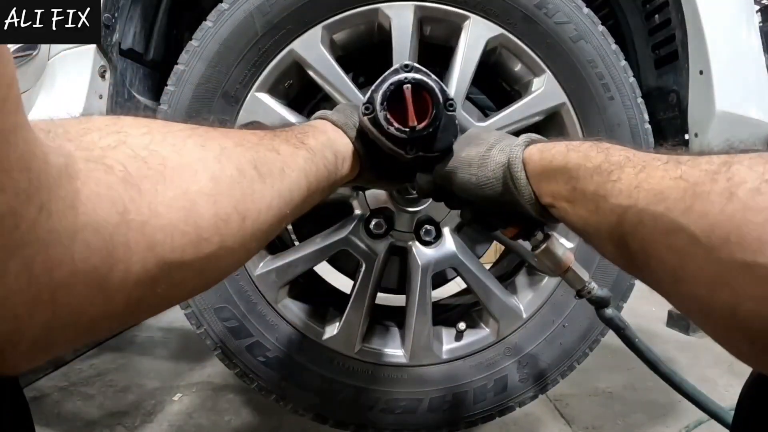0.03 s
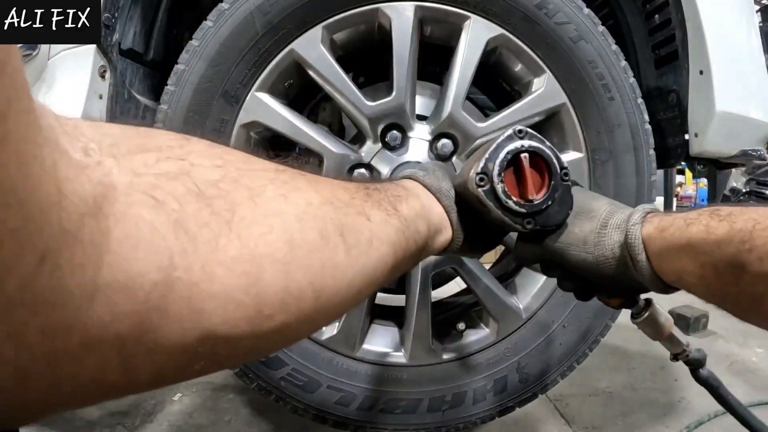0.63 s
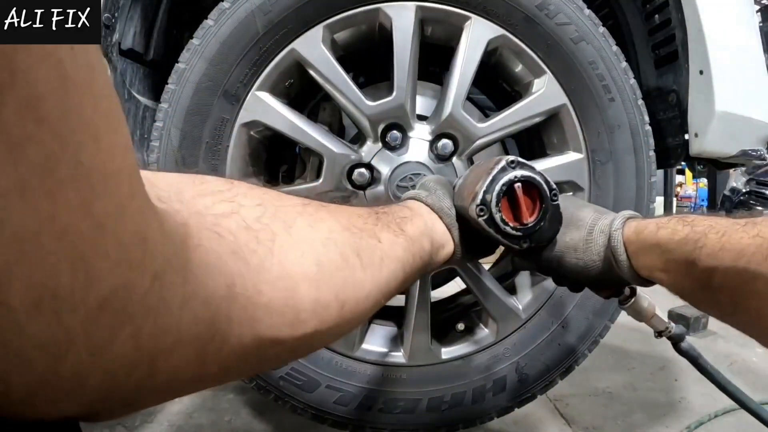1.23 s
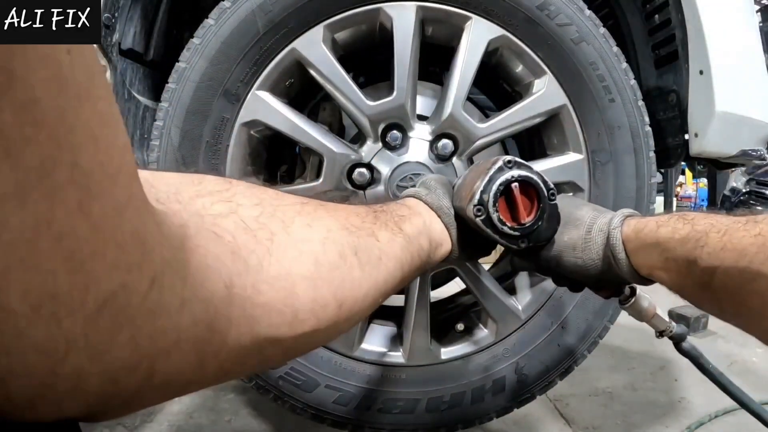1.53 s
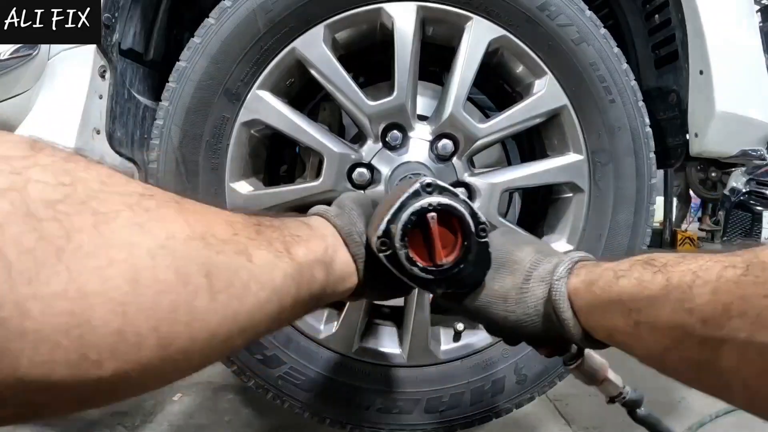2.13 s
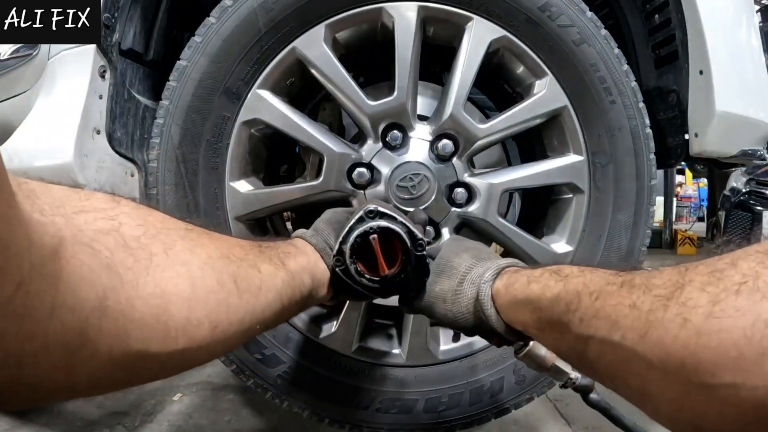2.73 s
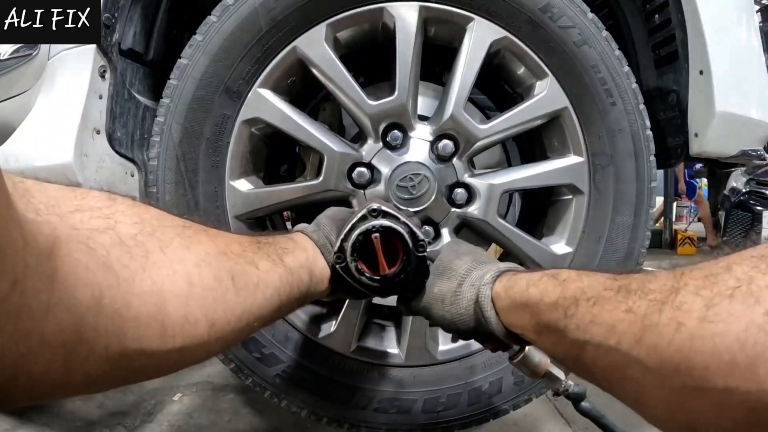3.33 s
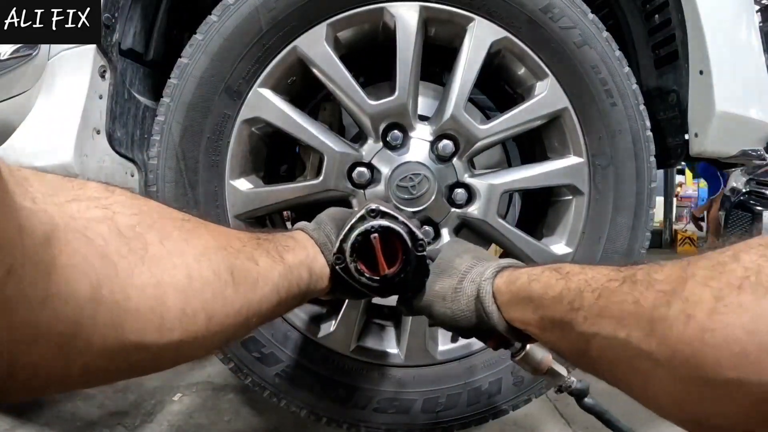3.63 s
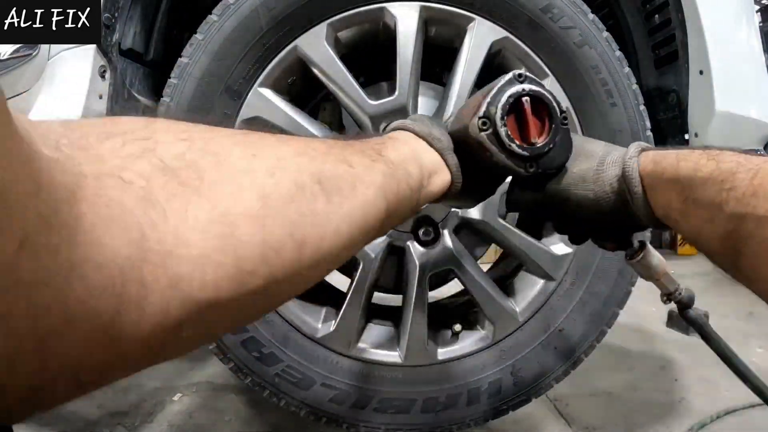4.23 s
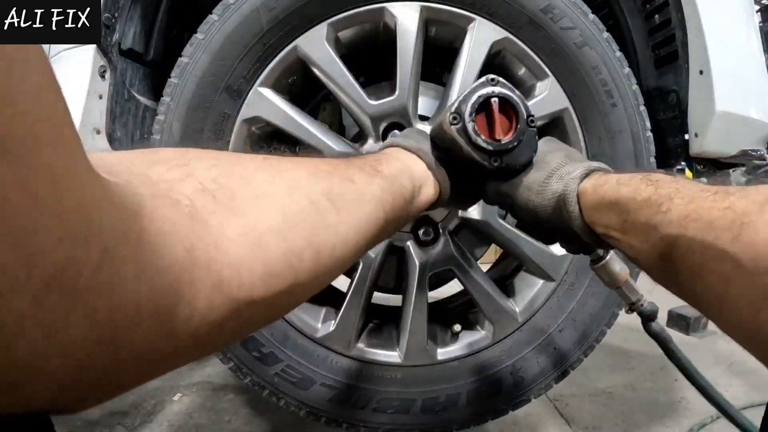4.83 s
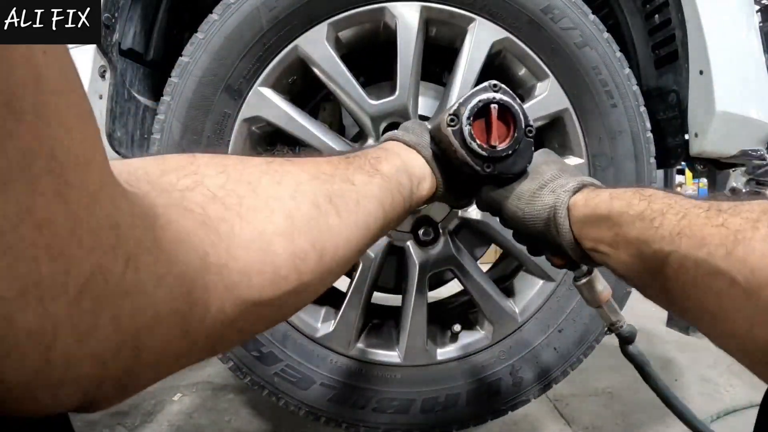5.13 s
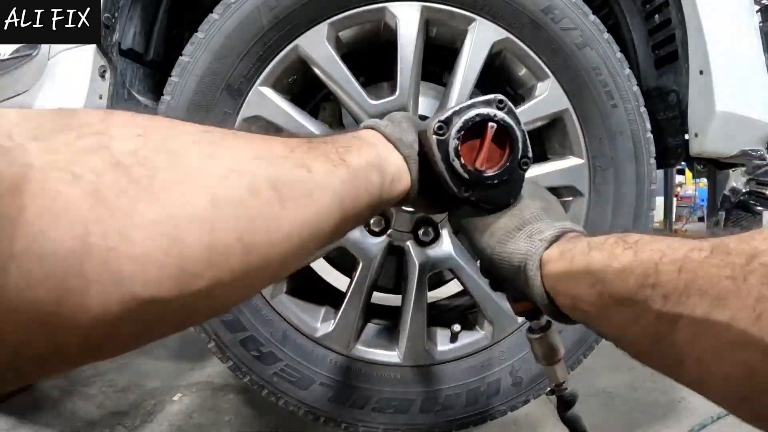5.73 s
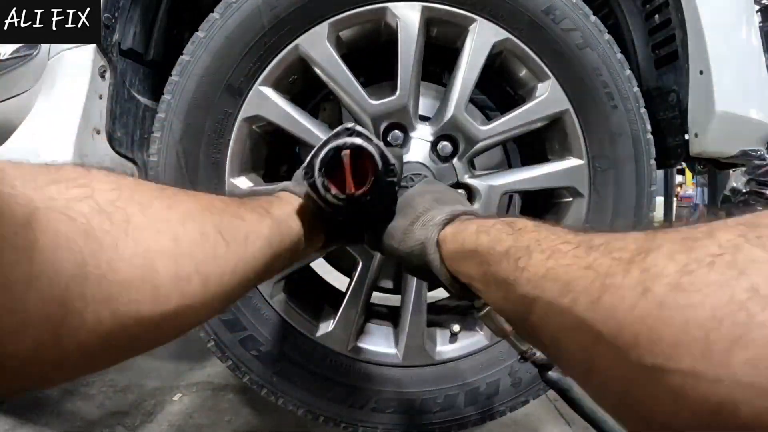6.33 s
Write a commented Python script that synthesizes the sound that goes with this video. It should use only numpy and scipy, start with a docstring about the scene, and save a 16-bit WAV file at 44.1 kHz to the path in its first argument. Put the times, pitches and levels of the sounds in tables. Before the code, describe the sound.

Close, rapid hammering from an air wrench tightens wheel nuts in bursts, its motor whooping up between light metal clinks and scrapes.

```python
"""A garage, with an air impact wrench close to a stereo microphone; workshop machinery hums.
We come in on a wheel nut being tightened: air rushes from the handle, the hammer strikes the anvil
about 29 times a second, steel rings and the wheel booms. The trigger is let go, leaving the hum and a
hiss at the hose. The socket clinks and scrapes onto the next nut, and gloves shuffle. Four more nuts
follow: each time the vane motor whoops up to speed, then the hammering sets in."""
import sys
import numpy as np
from scipy import signal
from scipy.fft import rfft, irfft
from scipy.io import wavfile
from scipy.ndimage import uniform_filter1d

SR = 44100
rng = np.random.default_rng(int(sys.argv[2]) if len(sys.argv) > 2 else 0)


def log_audio(samples):
    """Write samples as a 16-bit WAV file to the path given in sys.argv[1]."""
    # one column per channel
    frames = np.atleast_2d(samples).T
    # limit to full scale, then quantise
    limited = np.clip(frames, -1, 1)
    pcm = np.round(limited * 32767).astype(np.int16)
    wavfile.write(sys.argv[1], SR, pcm)


N = 290619
TIME = np.arange(N) / SR


def from_db(db):
    return 10 ** (np.asarray(db) / 20)


def rms_one(x):
    return x / np.sqrt(np.mean(x ** 2) + 1e-20)


def noise():
    return rng.standard_normal(N)


def drift(samples):
    """Random wander: noise averaged over so many samples."""
    return rms_one(uniform_filter1d(noise(), size=samples))


def gritty(grain_db, grain_s):
    """Noise whose level jumps from one tiny contact to the next."""
    knots = np.arange(0, TIME[-1], grain_s)
    contacts = np.clip(noise()[:len(knots)], -2, 2)
    return rms_one(noise() * from_db(grain_db * np.interp(TIME, knots, contacts)))


def gain_at(spectrum, hz):
    """Gain of a spectrum at given frequencies."""
    points_hz, db = np.transpose(spectrum)
    return from_db(np.interp(np.log(hz + 1e-9), np.log(points_hz), db))


def colour(x, spectrum, size=16384):
    """Minimum-phase filter with the given spectrum; white noise keeps its level."""
    gain = rms_one(gain_at(spectrum, np.fft.rfftfreq(size, 1 / SR)))
    cepstrum = irfft(np.log(gain))
    cepstrum[1:size // 2] *= 2
    cepstrum[size // 2 + 1:] = 0
    return signal.fftconvolve(x, irfft(np.exp(rfft(cepstrum))))[:N]


def lowpass(x, hz, order=2):
    return signal.sosfilt(signal.butter(order, hz, fs=SR, output="sos"), x)


def resonance(x, hz, width_hz):
    return signal.lfilter(*signal.iirpeak(hz, hz / width_hz, fs=SR), x)


def gate(start, stop, edge_s):
    """1 between two times, with sloping edges."""
    return np.clip(np.minimum(TIME - start, stop - TIME) / edge_s + .5, 0, 1)


def spans(rows, edge_s):
    """One gate per row, each at its own level."""
    return sum(from_db(db) * gate(start, stop, edge_s) for start, stop, db in rows)


def fall(t, t60):
    """Sudden start, exponential decay."""
    return (t >= 0) * from_db(-60 * np.maximum(t, 0) / t60)


def strike(t, rise_s, t60):
    """A contact builds over a moment, then dies away."""
    return np.clip(t / rise_s + 1, 0, 1) ** 2 * from_db(-60 * np.maximum(t, 0) / t60)


def swell(t, centre_s, half_s):
    """Flat-topped bump."""
    return np.exp(-((t - centre_s) / half_s) ** 4)


# The trigger held down. Each row: start and stop in seconds, exhaust level in dB.
TRIGGER_PULLS = [(-.6, 0.483, -26.5), (1.102, 2.037, -32), (2.67, 3.945, -27.5), (4.891, 5.817, -26.5),
                 (6.372, 6.7, -22.5)]
# The exhaust from close by. Each row: frequency in Hz, relative level in dB.
EXHAUST_SPECTRUM = [(40, 1.5), (120, 15.5), (400, 15), (600, -17.5), (1500, -2.5), (3000, -3.5),
                    (4500, -9.5), (6500, -14.5), (8300, -26), (10300, -45), (15000, -62)]

def exhaust():
    """Air rushes out of the handle, near the microphone, while the trigger is held."""
    return colour(noise() * spans(TRIGGER_PULLS, edge_s=0.0036), EXHAUST_SPECTRUM)


def sunk(delay_s=0, sink_s=1, stay_s=0.14, recover_s=0.41):
    """How far the background has sunk, 0 to 1: down as the wrench runs, creeping back afterwards."""
    dips = []
    for start, stop, _ in TRIGGER_PULLS:
        sinking = (TIME - start - delay_s) / sink_s
        recovering = 1 - (TIME - stop - stay_s) / recover_s
        dips.append(np.clip(np.minimum(sinking, recovering), 0, 1))
    return np.max(dips, axis=0)


# The workshop's hum, and handling noise. Each row: time in seconds, level in dB.
HUM_LEVELS = [(0.0, -34), (0.4, -46), (1.04, -26.5), (1.08, -29.5), (2.64, -30.5), (3.21, -48), (4.0, -34),
              (4.07, -55), (4.28, -27), (4.37, -35), (4.59, -23.5), (4.68, -38), (4.84, -22), (4.97, -32),
              (5.89, -35.5), (6.35, -25), (6.42, -35), (6.59, -30)]
HANDLING_LEVELS = [(0, -36), (.75, -43), (1.9, -43.5), (2.55, -37), (4.1, -41.5), (4.7, -44), (5.7, -44),
                   (6.2, -29.5), (6.59, -33.5)]
# Low rumble and midrange handling noise. Each row: frequency in Hz, relative level in dB.
RUMBLE_SPECTRUM = [(30, -3.5), (70, -0.5), (105, 3), (150, -3.5), (200, -2), (280, -9), (400, -8.5),
                   (600, -17.5), (1000, -28), (2000, -88)]
HANDLING_SPECTRUM = [(300, -0.5), (700, 3.5), (1000, 1.5), (1500, -1.5), (2200, -4), (3500, -8),
                     (5500, -9.5), (8000, -38), (12000, -72)]

def workshop(hum_hz=52.15, waver_hz=2.58, throb_db=2.5, rumble_db=-29.5, sink_db=5.5):
    """A wavering hum, a low rumble, and midrange handling noise that swells between nuts."""
    pitch = hum_hz + waver_hz * drift(SR // 10)
    throb = from_db(-0.5 + throb_db * drift(SR // 20))
    drone = np.sqrt(2) * throb * np.sin(2 * np.pi * np.cumsum(pitch) / SR)
    hum = from_db(np.interp(TIME, *np.transpose(HUM_LEVELS))) * drone
    rumble = from_db(rumble_db - sink_db * sunk()) * colour(noise(), RUMBLE_SPECTRUM)
    handling_gain = from_db(np.interp(TIME, *np.transpose(HANDLING_LEVELS)))
    return hum + rumble + handling_gain * colour(noise(), HANDLING_SPECTRUM)


def whistle(hz=5200, wander_hz=110, width_hz=300):
    """The hose leak sings: a narrow band of hiss whose pitch wanders."""
    wander = rms_one(uniform_filter1d(drift(SR // 6), size=SR // 6))
    band = rms_one(lowpass(noise(), width_hz / 2))
    return np.sqrt(2) * band * np.sin(2 * np.pi * np.cumsum(hz + wander_hz * wander) / SR)


# The hose leak and a thin hiss above it. Each row: frequency in Hz, relative level in dB.
LEAK_SPECTRUM = [(1000, -16), (3300, -3.5), (4300, 2.5), (4750, 3), (5250, 1.5), (5900, -4), (7500, -10.5),
                 (8500, -22.5), (10000, -14.5), (11500, -28), (15000, -56)]
THIN_SPECTRUM = [(10500, -29), (11400, -1), (12300, 12.5), (13500, 3), (14700, 10), (16000, -16.5)]

def hisses(leak_db=-45.5, thin_db=-57, flutter_db=-2.4, side_db=2, whistle_db=-10):
    """Air flutters out of the hose coupling; a thin hiss lies wide across both channels."""
    down = sunk()
    shut = sunk(delay_s=0.25, sink_s=0.22, stay_s=0.19, recover_s=0.22)   # a later, quicker dip
    flutter = flutter_db * drift(SR // 25)
    leak_gain = from_db(leak_db - 7 * down + flutter)
    thin_gain = from_db(thin_db - 6 * down - 15 * shut + flutter)
    mid = colour(noise(), THIN_SPECTRUM)
    side = from_db(side_db) * colour(noise(), THIN_SPECTRUM)
    leak = colour(noise(), LEAK_SPECTRUM) + from_db(whistle_db) * whistle()
    return leak_gain * leak + thin_gain * np.array([mid + side, mid - side])


# Hammering, nut by nut. Each row: first blow, end, first period and period growth per blow,
# all in seconds, then strength in dB.
HAMMER_BURSTS = [(0.0202, 0.525, .0341, .000102, -16.5), (1.2089, 2.035, .03179, .000166, -15.5),
                 (2.8102, 3.93, .03423, .0000916, -14), (5.0132, 5.81, .0317, .000204, -15),
                 (6.4847, 6.6, .0327, .0001, -14)]

def blow_train(scatter_db=1.1, jitter_s=.0007):
    """Time and strength in dB of each blow: uneven, and slowing as the nut tightens."""
    trains = []
    for first, until, period, growth, level_db in HAMMER_BURSTS:
        late, strong = rng.standard_normal((2, 64))
        k = np.arange(len(late))
        due = first + period * k + growth * k ** 2 / 2
        blows = np.column_stack([due + jitter_s * late, level_db + scatter_db * strong])
        trains.append(blows[due < until])
    return np.vstack(trains)


def per_blow(blows, shape, follow, scatter_db, jitter_s=0, **shape_settings):
    """Lays an envelope at every blow; follow is how much it tracks the blow's strength."""
    times, db = blows.T
    strong, late = rng.standard_normal((len(times), 2)).T
    levels = from_db(db.mean() + follow * (db - db.mean()) + scatter_db * strong)
    out, reach = np.zeros(N), SR // 20
    for at, level in zip(times + jitter_s * late, levels):
        near = slice(max(int(at * SR) - reach, 0), int(at * SR) + reach)
        out[near] += level * shape(TIME[near] - at, **shape_settings)
    return out


# The boom of the wheel from close by. Each row: frequency in Hz, relative level in dB.
WHEEL_SPECTRUM = [(25, -7), (60, -5.5), (120, -0.5), (200, -2.5), (280, 0.5), (370, 3.5), (430, -2.5),
                  (500, -18.5), (600, -52.5), (1200, -38)]

def wheel(blows, shove_db=-20, kick_db=-22):
    """Each blow shoves the tool and the wheel, which boom dully; the rebound adds a kick."""
    shove = per_blow(blows, swell, follow=0.55, scatter_db=1, jitter_s=0.00015,
                     centre_s=-0.011, half_s=0.0093)
    kick = per_blow(blows, swell, follow=0.32, scatter_db=4, jitter_s=0.00017,
                    centre_s=0.0022, half_s=0.0038)
    shaking = rms_one(lowpass(noise(), 600))
    judder = rms_one(np.tanh(2 * shaking))   # play in the socket limits the force
    return colour(judder * (from_db(shove_db) * shove + from_db(kick_db) * kick), WHEEL_SPECTRUM)


def cam_rub(t, lead_s=.0115):
    """The hammer drops onto its cam and rubs along it until the strike."""
    return fall(t + lead_s, t60=1.0) * (t < 0)


# Struck steel at the microphone. Each row: frequency in Hz, relative level in dB.
STEEL_SPECTRUM = [(200, -17), (600, -5), (900, -10), (1430, -1.5), (1800, -5), (2300, 1.5), (3000, 1.5),
                  (3900, 0.5), (4800, -6), (6300, -8), (7100, -14), (8400, -30.5), (9400, -30),
                  (10300, -26.5), (11500, -37.5), (15000, -51)]
# Each nut rings in its own way. Each row: start in seconds, then pitch in Hz and gain in dB
# for its low, main and high ring.
NUT_RINGS = [(0, 2230, -28, 3330, 4.5, 5800, 6), (1.1, 2275, 1.5, 3150, -1, 5600, -5),
             (2.68, 2480, 1, 3300, -15, 5530, -23), (4.9, 2210, -18, 3240, 1.5, 5900, -3),
             (6.37, 2260, -10, 3280, -13, 5760, -4)]

def hammer(blows, crack_db=-3, ring_db=-6, cam_db=-8, seating_db=3, level_db=-3.5):
    """The hammer grinds up its cam, cracks onto the anvil, and socket and nut ring briefly."""
    cam = per_blow(blows, cam_rub, follow=0.98, scatter_db=3, jitter_s=.0008)
    crack = per_blow(blows, strike, follow=0.62, scatter_db=1.6, rise_s=0.0022, t60=0.02)
    ring = per_blow(blows, strike, follow=0.92, scatter_db=1.7, rise_s=0.0019, t60=0.059)
    grind = from_db(cam_db) * cam * gritty(grain_db=1.5, grain_s=0.001)
    impact = (from_db(crack_db) * crack + from_db(ring_db) * ring) * noise()
    steel = colour(grind + impact, STEEL_SPECTRUM)
    out = steel.copy()
    ends = [row[0] for row in NUT_RINGS[1:]] + [np.inf]
    for (start, *rings), end in zip(NUT_RINGS, ends):
        struck = steel * (TIME >= start) * (TIME < end)
        for hz, db in zip(rings[::2], rings[1::2]):
            # each blow lands a little differently
            seating = np.interp(TIME, blows[:, 0], rng.uniform(-1.1, 1, len(blows)))
            out += resonance(struck * from_db(db + seating_db * seating), hz, width_hz=170)
    return from_db(level_db) * out


# Width of the blows at the microphone. Each row: frequency in Hz, side against mid in dB.
BLOW_WIDTH = [(400, -39), (1200, -37), (3200, -50), (5500, -19), (10000, -20.5)]

def stereo(mid, size=512):
    """Nearly mono; the treble reaches the two channels with scattered phase."""
    hz = np.fft.rfftfreq(size, 1 / SR)
    scatter = 1j * rng.choice([-1, 1], len(hz)) * gain_at(BLOW_WIDTH, hz)
    response = np.roll(irfft(scatter), size // 2)
    side = signal.fftconvolve(mid, response)[size // 2:][:N]
    return np.array([mid + side, mid - side])


def garage(x, t60=0.66, level_db=-8.5, band_hz=(450, 4500), first_echo_s=0.0067, patterns=3):
    """Dull, diffuse reverberation off the walls; the echo pattern shifts as the mechanic moves."""
    walls = signal.butter(1, band_hz, "band", fs=SR, output="sos")
    out = np.zeros(N)
    for k in range(patterns):
        tail = rng.standard_normal(SR) * fall(TIME[:SR] - first_echo_s, t60)
        tail = signal.sosfilt(walls, tail / np.linalg.norm(tail))
        share = np.sqrt(2 / patterns) * np.cos(np.pi * (TIME + k / patterns))
        out += signal.fftconvolve(x * share, tail)[:N]
    return from_db(level_db) * out


# The socket against nuts and rim, close by. Each row: start in seconds, relative level in dB,
# pitch in Hz, note against crackle in dB, seconds to fall by 60 dB.
SOCKET_CLINKS = [(0.511, -24.5, 4350, 0, 0.071), (0.532, -29.5, 4140, 8, 0.028), (.826, -32, 2950, -7, .03),
                 (.905, -33, 2980, 0.5, .14), (0.934, -35, 978, 10, 0.094), (0.952, -38, 856, 11, 0.1),
                 (0.979, -38, 626, 11.5, 0.098), (2.168, -57.5, 1170, 24, 0.043),
                 (2.461, -35.5, 2100, -7, 0.13), (2.485, -34, 2080, -2, 0.087),
                 (4.03, -50.5, 840, 24, 0.029), (4.074, -54, 934, 22, 0.057), (4.26, -30, 2360, -8, 0.047),
                 (4.645, -34.5, 3300, -5, 0.039), (4.772, -32.5, 5200, -6, 0.098),
                 (4.873, -20.5, 332, -2, 0.07), (4.962, -20.5, 2800, 4.5, 0.027),
                 (4.973, -23.5, 5950, 2, 0.023), (5.81, -22.5, 3790, -5, 0.063),
                 (6.385, -21, 3350, -11, 0.053), (6.408, -21.5, 5800, -12, 0.043)]
# The crackle of a contact. Each row: frequency in Hz, relative level in dB.
CRACKLE_SPECTRUM = [(200, 17), (1200, -3.5), (2500, 0.5), (6000, -0.5), (8300, -22), (14000, -46)]

def clinks(level_db=5.5):
    """Light metal contacts: a short crackle and one ringing note each."""
    ticks, notes = np.zeros(N), np.zeros(N)
    for start, db, hz, note_db, t60 in SOCKET_CLINKS:
        near = slice(int(start * SR), int(start * SR) + SR // 2)
        t = TIME[near] - start
        decay = from_db(db) * fall(t, t60)
        ticks[near] += decay
        notes[near] += from_db(note_db) * decay * np.sin(2 * np.pi * hz * t)
    return from_db(level_db) * (colour(ticks * noise(), CRACKLE_SPECTRUM) + notes)


# The socket sliding over nuts and rim. Each row: start and stop in seconds, relative level in dB.
SOCKET_SLIDES = [(0.517, 0.608, -42), (4.173, 4.3, -45), (6.06, 6.372, -45)]
# Its modes. Each row: frequency in Hz, width in Hz, gain in dB.
SOCKET_MODES = [(2170, 120, 9), (2800, 220, 2), (3070, 190, 0.5), (3800, 140, 0.5)]

def slides(level_db=14):
    """Steel dragged over steel: gritty friction rings the modes of the socket."""
    friction = gritty(grain_db=5, grain_s=0.0053) * spans(SOCKET_SLIDES, edge_s=0.02)
    rings = sum(from_db(db) * resonance(friction, hz, width) for hz, width, db in SOCKET_MODES)
    return from_db(level_db) * lowpass(rings, 6500, order=4)


# The motor running free before a nut seats. Each row: start and stop in seconds, first and last
# pitch in Hz, relative levels of tone and rattle in dB.
MOTOR_SPINS = [(0.926, 0.975, 221, 597, -26, -21), (1.118, 1.214, 79.5, 592, -16.5, -17.5),
               (2.695, 2.792, 110.2, 603, -17, -18), (4.913, 5.02, 39.6, 600, -18, -17),
               (6.392, 6.488, 126.8, 598, -17, -19.5)]
# Motor body and loose socket from close by. Each row: frequency in Hz, relative level in dB.
MOTOR_SPECTRUM = [(100, -5), (200, -4), (330, 5), (430, -9.5), (540, -11), (700, -24), (900, -5),
                  (1040, -11.5), (1140, -0.5), (1260, -6.5), (1700, -9), (2100, -31)]
RATTLE_SPECTRUM = [(100, 2), (400, 10), (650, -7.5), (1000, 0.5), (1800, -1), (2600, 0.5), (4200, -7.5),
                   (6300, -11), (8300, -27), (13000, -33), (16000, -40)]

def motor(wobble=0.011, overtone_db=-2, settle_db=-6, whine_hz=430, thud_hz=300, thud_db=6):
    """The vane motor takes up slack with a thud and whoops up; the socket rattles less as it settles."""
    tone, rattle = np.zeros(N), np.zeros(N)
    unsteady = drift(200)
    for start, stop, low_hz, high_hz, tone_db, rattle_db in MOTOR_SPINS:
        on = gate(start, stop, edge_s=0.0083)
        live = on > 0
        progress = np.interp(TIME[live], [start, stop], [0, 1])
        hz = (low_hz + (high_hz - low_hz) * progress ** 0.73) * (1 + wobble * unsteady[live])
        phase = 2 * np.pi * np.cumsum(hz) / SR
        brightness = np.minimum(hz / whine_hz, 1) ** 2   # overtones come in with speed
        for k in (1, 2, 3):
            gain = from_db(tone_db + overtone_db * (k - 1)) * gain_at(MOTOR_SPECTRUM, k * hz)
            partial = np.sqrt(2) * np.sin(k * phase + 2 * np.pi * rng.random())
            tone[live] += on[live] * gain * brightness ** (k - 1) * partial
        t = TIME[live] - start
        thud = strike(t - .008, rise_s=0.0055, t60=0.034) * np.sin(2 * np.pi * thud_hz * t)
        tone[live] += from_db(tone_db + thud_db) * thud
        rattle[live] += from_db(rattle_db + settle_db * progress) * on[live]
    return tone + colour(rattle * gritty(grain_db=1.5, grain_s=0.0011), RATTLE_SPECTRUM)


# Tool and hose being moved between nuts. Each row: start and stop in seconds, level in dB.
TOOL_MOVES = [(0.94, 1.103, -28.5), (4.297, 4.426, -31), (4.612, 4.867, -31)]

def shuffles():
    """Gloves and hose rub dully."""
    rubbing = gritty(grain_db=3, grain_s=0.012) * spans(TOOL_MOVES, edge_s=0.037)
    return colour(rubbing, RUMBLE_SPECTRUM)


def scene():
    """The wrench and its socket close to the microphone, the garage around them."""
    blows = blow_train()
    steel = hammer(blows)
    centre = wheel(blows) + exhaust() + motor() + clinks() + slides()
    return stereo(steel) + centre + garage(steel + centre) + shuffles() + workshop() + hisses()


def record(dry, cutoff_hz=15500):
    """The highest peaks are rounded and the top of the treble is cut."""
    rounded = 1.136 * np.tanh(dry / 1.105)
    return signal.sosfilt(signal.ellip(10, .1, 90, cutoff_hz, fs=SR, output="sos"), rounded)


dry = scene()
out = record(dry)
log_audio(out)
```